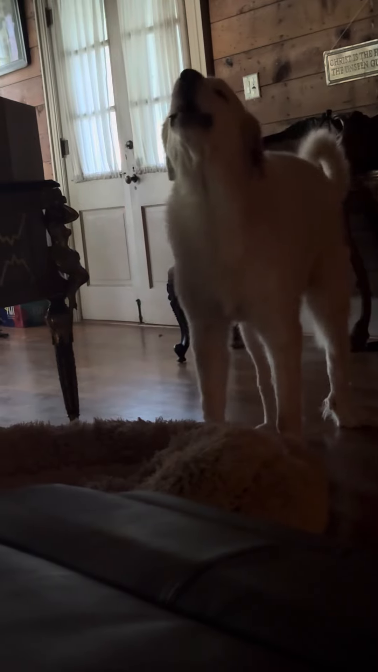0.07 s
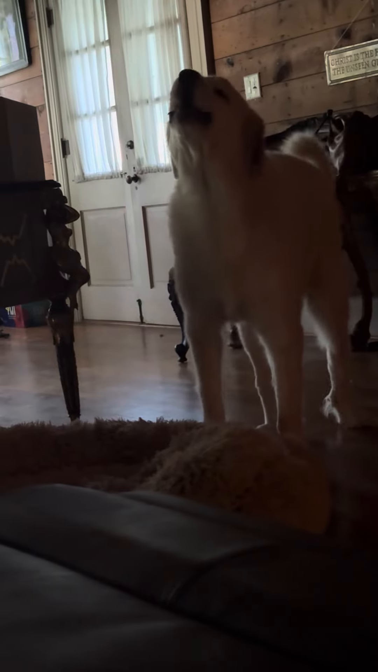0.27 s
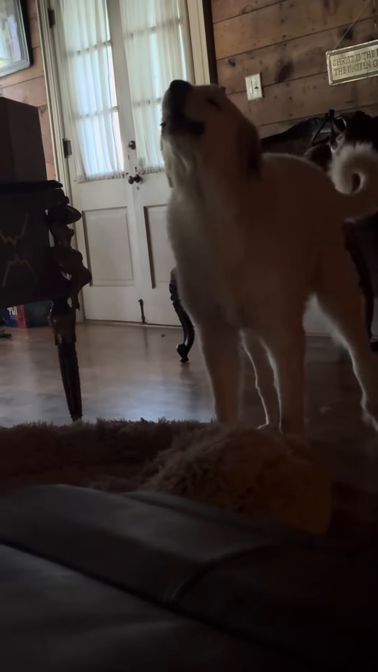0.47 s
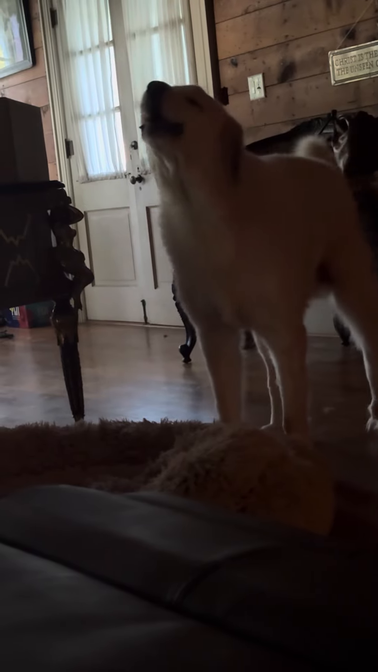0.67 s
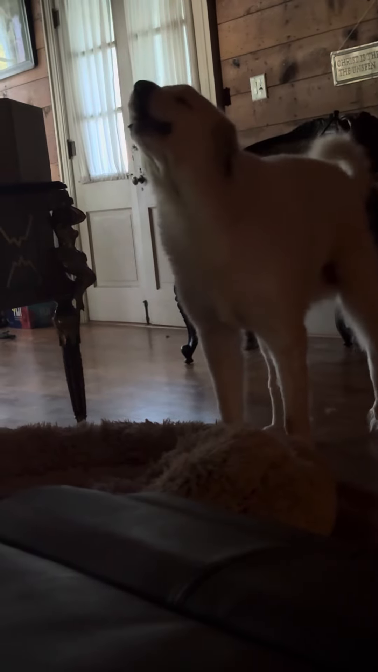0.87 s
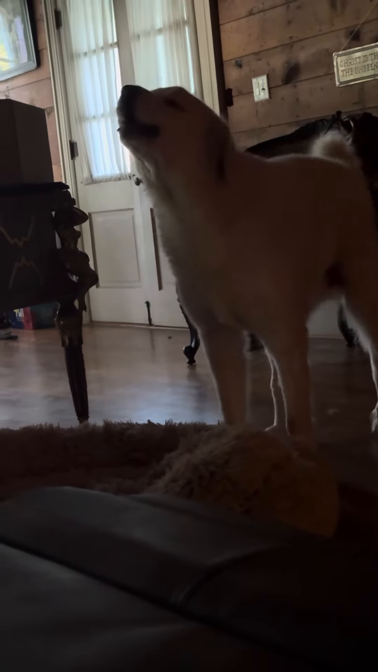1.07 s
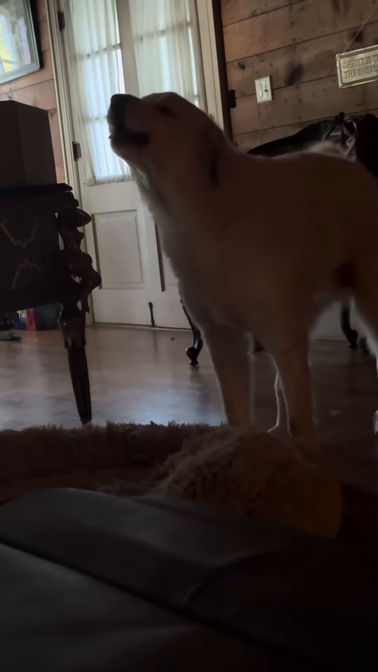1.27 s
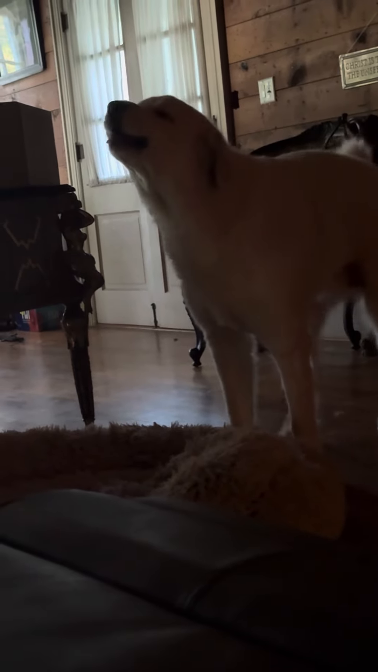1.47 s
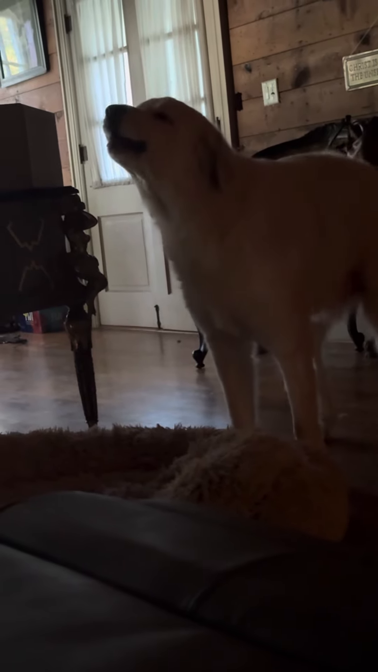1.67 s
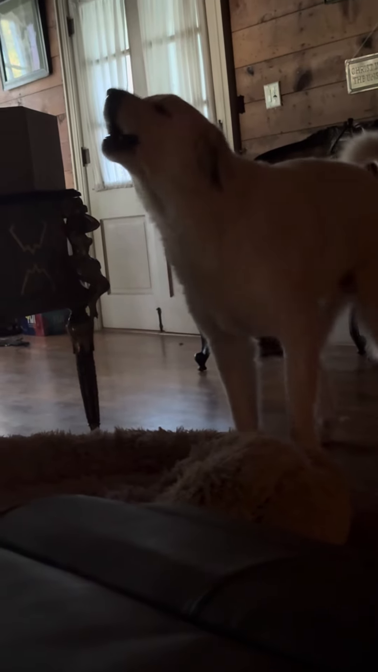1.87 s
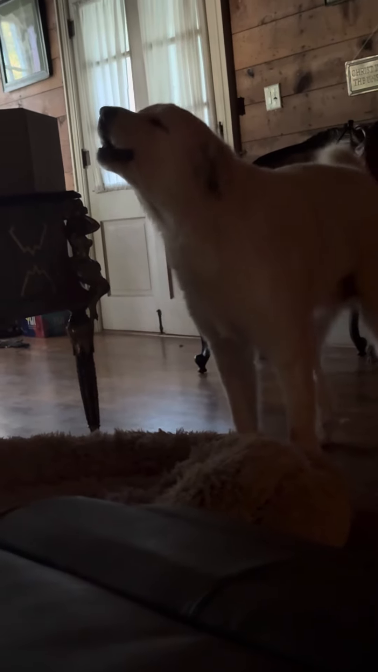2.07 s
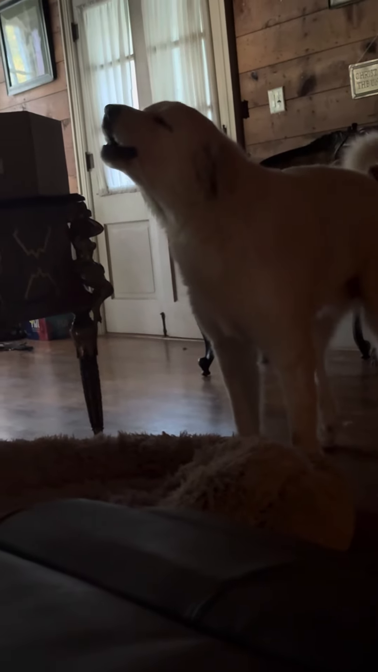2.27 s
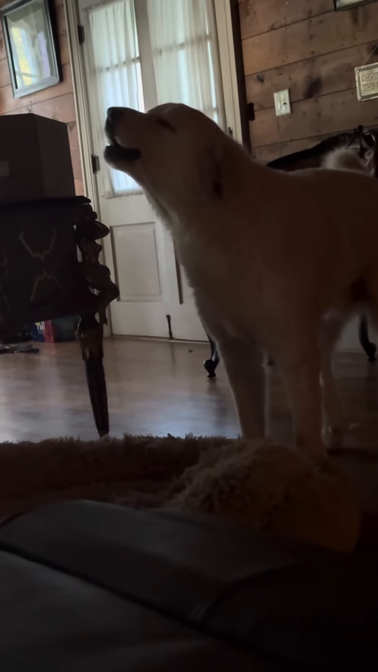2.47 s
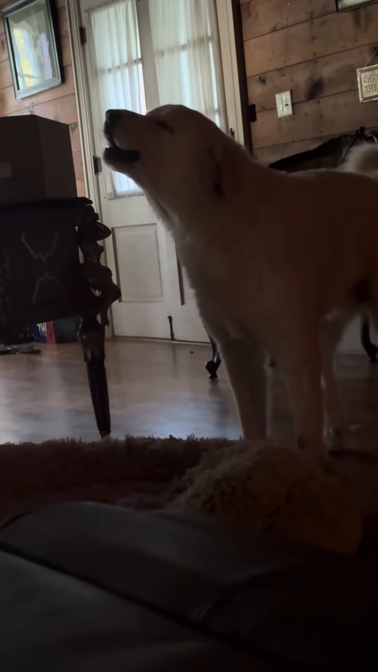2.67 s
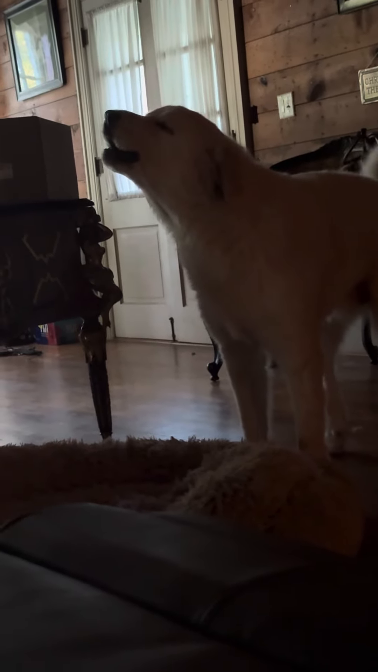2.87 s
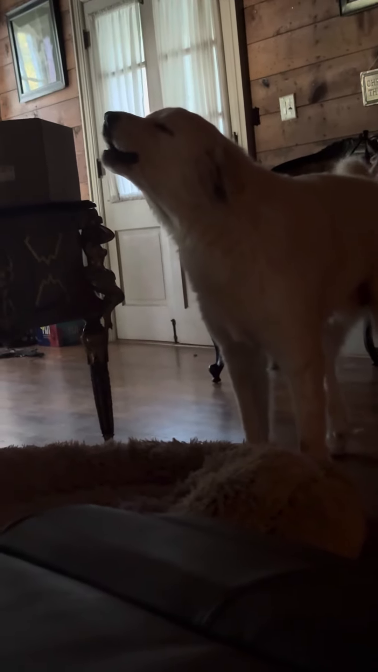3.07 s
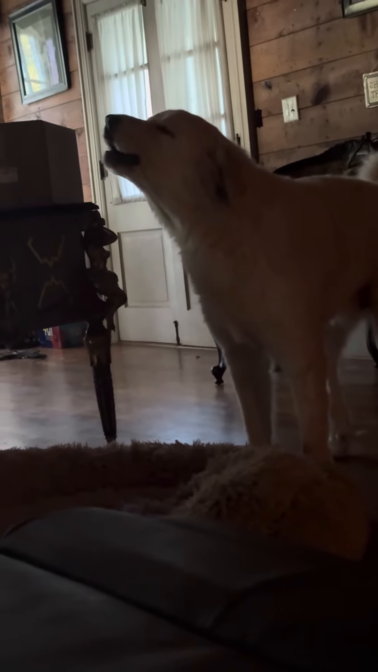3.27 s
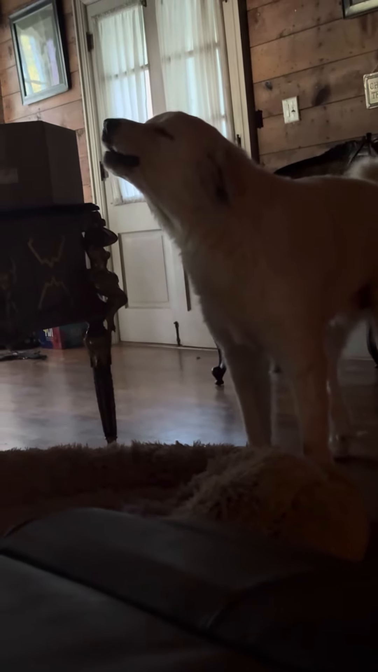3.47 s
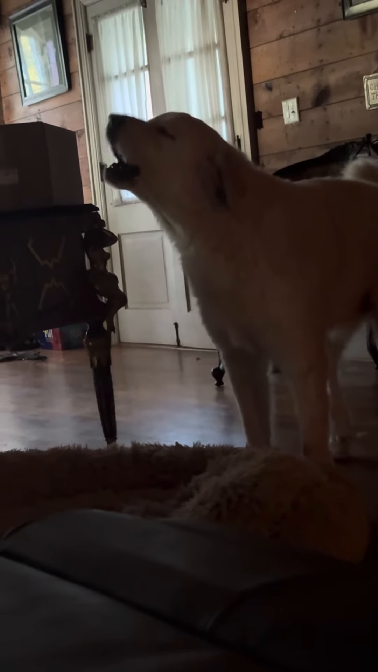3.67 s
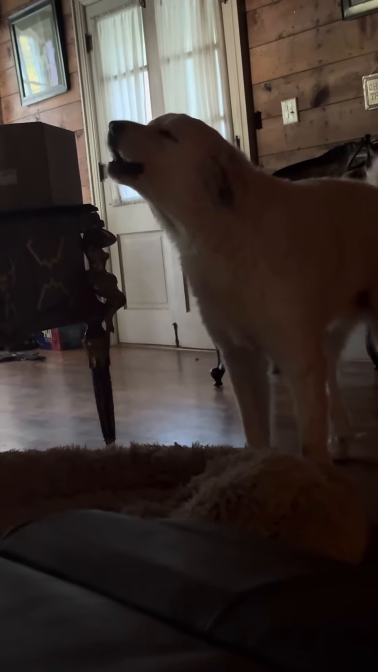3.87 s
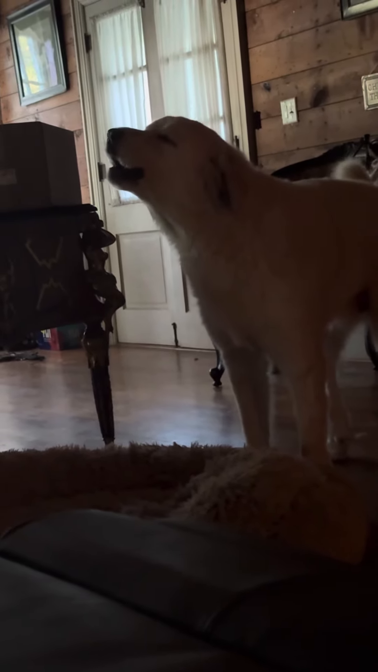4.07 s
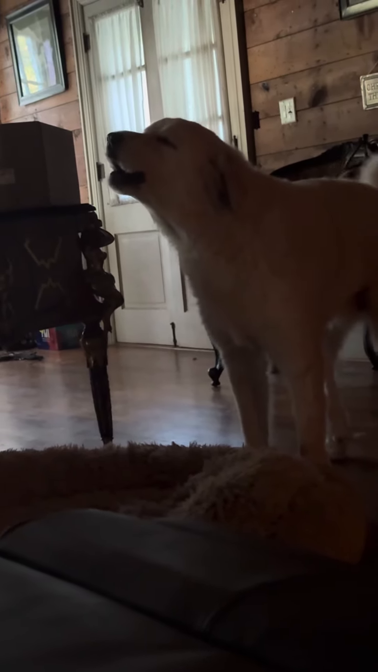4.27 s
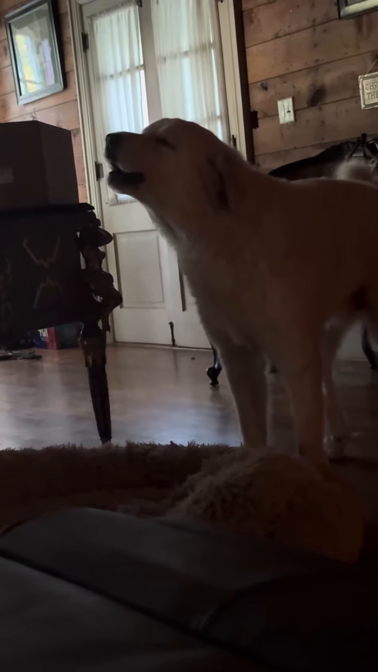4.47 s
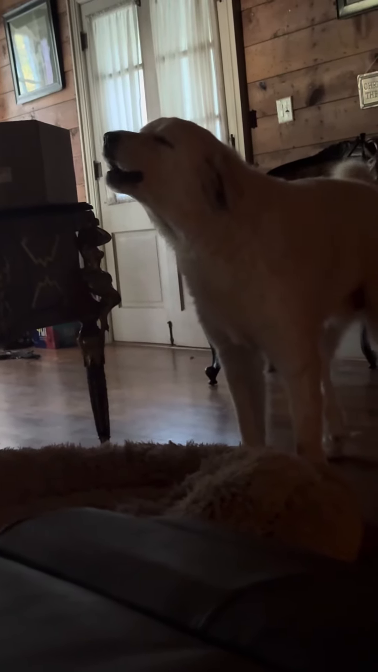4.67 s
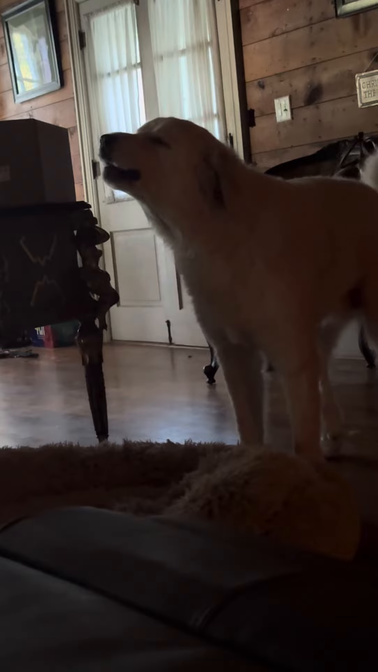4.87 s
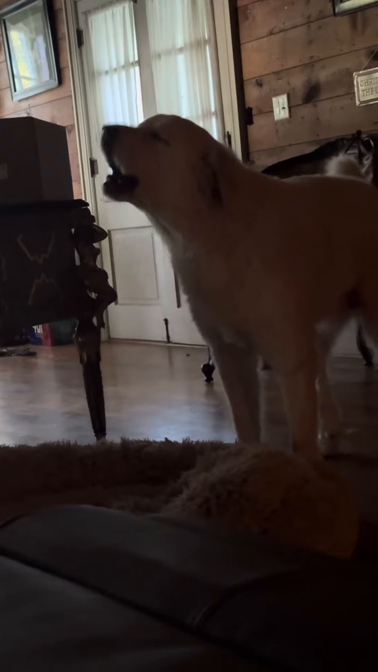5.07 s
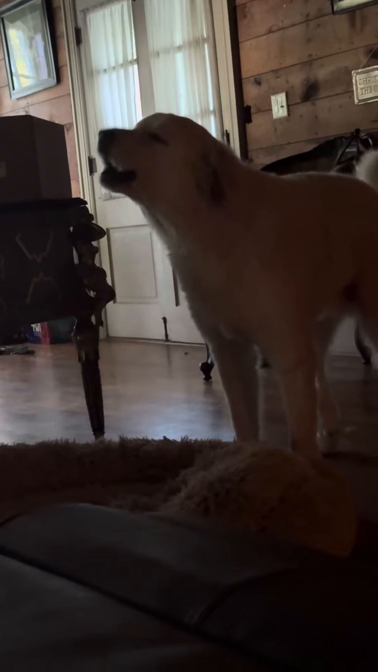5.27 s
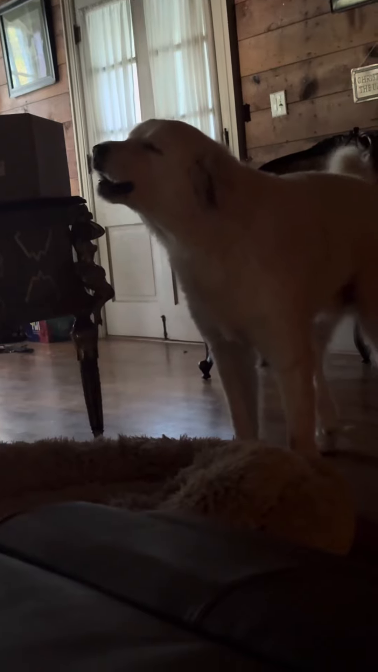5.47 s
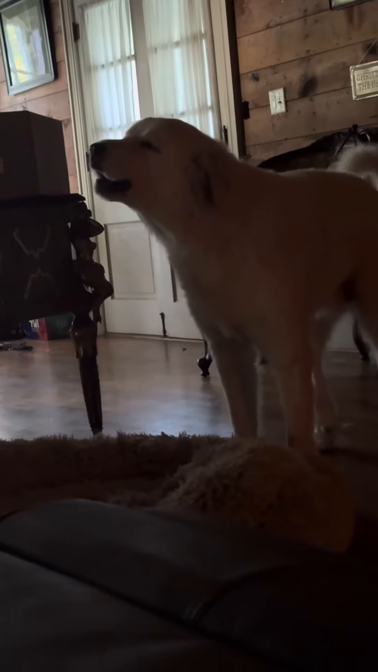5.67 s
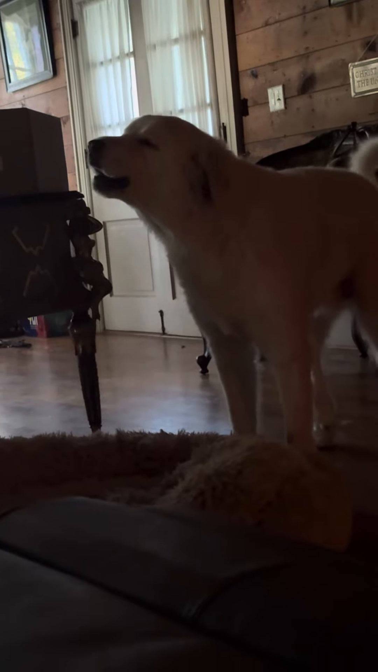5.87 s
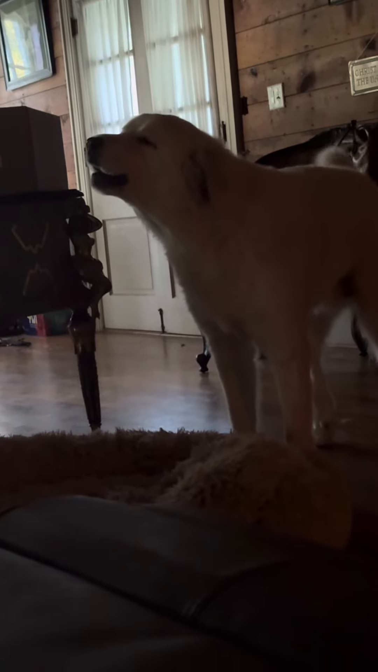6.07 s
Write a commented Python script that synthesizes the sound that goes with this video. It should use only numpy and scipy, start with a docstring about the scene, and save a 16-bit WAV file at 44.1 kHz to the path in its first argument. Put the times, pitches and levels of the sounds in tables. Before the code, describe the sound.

A large dog howls in a wood-walled living room, a couple of metres from a small stereo microphone, with short room echoes and very faint rumble and hiss. At 0 s it is already sounding on a lower chest note, which leaps at about 0.1 s to a bright, wavering high note held until 1.4 s, then sags away. In the pause, around 1.53-1.65 s, claws tick rapidly on floorboards. At 1.76 s a second howl yelps high, cracks down to a rounder low note, then flips up at 2.45 s and holds until 3.4 s. The third, from 3.65 s, starts high, drops at 3.77, rises again at 4.1 with strong wobbling, and sinks out by 4.9. A lone claw tick falls at 4.99 s. The last howl starts high at 5.07 s, breaks low at 5.2, and flips up near 5.98 s as the sound ends. Breaks are briefly rough and breathy.

```python
"""A large dog howls in a wood-walled living room, a couple of metres from a phone's two microphone ports.
Over rumble and hiss, the first howl opens on a chest note and leaps to a head note a fifth higher; claws
tick on the boards in the pause, then three more howls flip between the two, a lone tick before the last.
Each note is a sum of sine overtones with puffed noise; around each flip the folds also beat at the pitch
the two notes share, which adds faint lines between the overtones. Feedback delays make the room."""
import sys
import numpy as np
from scipy import signal
from scipy.fft import rfft, irfft, next_fast_len
from scipy.io import wavfile
from scipy.ndimage import uniform_filter1d

SR = 44100
rng = np.random.default_rng(int(sys.argv[2]) if len(sys.argv) > 2 else 0)


def voltage_ratio(decibels):
    """Convert decibels (scalar or array-like) to amplitude ratios, 20 dB per decade."""
    exponent = np.asarray(decibels, float) / 20
    return 10 ** exponent


def generate_wav(signal):
    """Clip the signal to [-1, 1] and save it as 16-bit WAV at the path in sys.argv[1]."""
    frames = np.transpose(np.atleast_2d(signal))
    scaled = np.clip(frames, -1, 1) * 32767
    pcm = np.round(scaled).astype(np.int16)
    wavfile.write(sys.argv[1], SR, pcm)


N = 269451


def at_hz(points, hz):
    """Second column of a table, read at any frequency along a logarithmic axis."""
    table = np.array(points)
    return np.interp(np.log(hz + 1e-9), np.log(table[:, 0]), table[:, 1])


def drift(rate, size):
    """Slow chance with spread 1: noise through a double one-pole low-pass at rate (Hz), run in."""
    r = np.exp(-2 * np.pi * rate * 64 / SR)   # one step every 64 samples
    noise = rng.standard_normal(size // 64 + 402)
    slow = signal.lfilter([1], [1, -2 * r, r * r], noise)[400:]
    slow = slow * (1 - r * r) ** 1.5 / np.sqrt(1 + r * r)
    return np.interp(np.arange(size) / 64, np.arange(len(slow)), slow)


def coloured(spectrum, channels):
    """Noise of rms 1 with the given spectrum."""
    size = next_fast_len(N)
    weight = voltage_ratio(at_hz(spectrum, np.fft.rfftfreq(size, 1 / SR)))
    x = irfft(rfft(rng.standard_normal((channels, size))) * weight, size)[:, :N]
    return x / np.sqrt(np.mean(x ** 2))


def appliances():
    """Steady low rumble of household appliances: shaped noise, for middle and side."""
    # rumble spectrum: (frequency [Hz], relative density [dB])
    rumble = [(20, -45.5), (32, -19.5), (45, 8), (60, 5), (110, 11), (150, 4), (200, -2), (260, -16.5),
              (340, -24), (600, -57)]
    return voltage_ratio(-60) * coloured(rumble, channels=2)


def room_air():
    """Steady hiss of the room's air: shaped noise, for middle and side."""
    # hiss spectrum: (frequency [Hz], relative density [dB])
    hiss = [(200, -10.5), (400, 7), (900, -4.5), (1800, -15), (2600, -15.5), (3250, -37), (4000, -18),
            (7000, -17.5), (9000, -35.5), (12000, -42.5), (14500, -41.5), (16000, -47.5)]
    return voltage_ratio(-67.5) * coloured(hiss, channels=2)


def room(x):
    """Twelve feedback delays each for middle and side, dying as the walls absorb."""
    # time to die by 60 dB: (frequency [Hz], time [s])
    decay_time = [(200, 0.85), (500, 0.54), (1400, 0.61), (4000, 0.63), (10000, 0.88)]
    # echo gain, against the direct sound: (frequency [Hz], gain [dB])
    echo_gain = [(200, -23), (400, -7), (700, -11), (1500, -6), (3000, -6.5), (5000, -10.5), (9000, -3.5)]
    # how wide the room sounds, side against middle: (frequency [Hz], gain [dB])
    side_gain = [(100, -31), (500, -13), (1200, -3), (2200, -28), (5000, -19)]
    size = next_fast_len(N + SR)
    hz = np.fft.rfftfreq(size, 1 / SR)
    t60 = at_hz(decay_time, hz)
    wet = np.zeros((2, len(hz)), complex)
    for k, lag in enumerate(np.geomspace(.0131, .0677, 24)):   # seconds
        echo = voltage_ratio(-60 * lag / t60) * np.exp(-2j * np.pi * hz * lag)
        sign = (-1) ** (k // 2)
        wet[k % 2] += sign * echo / (1 - echo) / np.sqrt(12)   # endless repeats, middle and side in turn
    wet *= voltage_ratio(at_hz(echo_gain, hz))
    wet[1] *= voltage_ratio(at_hz(side_gain, hz))
    return irfft(wet * rfft(x, size), size)[:, :N]


def claws():
    """Claws on floorboards: each tick rings the modes of the boards with strengths of its own."""
    # ticks, before each mode's own level: (time [s], level [dB])
    ticks = [(1.532, -63), (1.562, -51.5), (1.5805, -45), (1.6062, -44), (1.618, -48.5), (1.6547, -44.5),
             (4.9862, -48)]
    # modes of the boards: (frequency [Hz], level against the tick [dB], time to die by 60 dB [s])
    board_modes = [(69, 2, 0.1), (705, -7, 0.074), (1400, -6, .012), (4050, 2, 0.0037),
                   (5170, -7.5, 0.0073), (7560, -7.5, .006), (10430, -10, .004)]
    at = [round(s * SR) for s, _ in ticks]
    tick_db = np.array(ticks)[:, 1]
    out = np.zeros(N)
    for hz, level_db, t60 in board_modes:
        clicks = np.full(N, 1e-18)   # never quite zero
        clicks[at] = voltage_ratio(tick_db + level_db + rng.normal(0, 2.5, len(at)))
        r = voltage_ratio(-60 / (t60 * SR))
        w = 2 * np.pi * hz / SR
        out += signal.lfilter([0, np.sin(w)], [1, -2 * r * np.cos(w), r * r], clicks)
    return out


def unrest(s):
    """Level of the in-between lines and hoarseness (0-1): calm, with a peak at every flip."""
    # flips and breaks of the voice, where in-between lines and hoarseness swell and fade:
    # (time [s], peak of the lines [dB], hoarseness before the limit of 1, build-up [dB/s], fading [dB/s])
    flips = [(0.0, -23.5, 0.7, 300, 358.5), (0.126, -30.5, .9, 257, 386.5), (1.417, -56.5, 0.7, 447, 510),
             (1.86, -27, 1.1, 200.5, 455), (2.478, -39, 0.9, 599, 126.5), (3.395, -60.5, 0.8, 453.5, 131.5),
             (3.768, -31, 1, 220, 401.5), (4.152, -30.5, 0.9, 204, 140), (4.745, -42.5, .9, 398.5, 296),
             (4.82, -47.5, 1, 302.5, 197.5), (5.18, -44, 0.7, 143.5, 204), (6.009, -32, 0.9, 507.5, 244)]
    calm_db = -87          # in-between lines far from a flip
    hoarse_range_db = 29   # hoarseness drops by 1 while the lines fade this much
    at, peak_db, hoarse, up, down = np.transpose(flips)[..., None]
    loss_db = np.where(s < at, up * (at - s), down * (s - at))
    between_db = np.maximum(np.max(peak_db - loss_db, axis=0), calm_db)
    rough = np.clip(np.max(hoarse - loss_db / hoarse_range_db, axis=0), 0, 1)
    return between_db, rough


def note(rows, lift, muzzle, air, rasp, count):
    """One held note: overtones of the pitch, lines at multiples of its count-th part, air puffed each cycle."""
    # in-between lines, against the strongest of them: (frequency [Hz], level [dB])
    between = [(180, -57.5), (260, -24.5), (400, -4), (750, 0), (950, -0.5), (1300, -12), (1600, -6.5),
               (1900, -9.5), (2400, -37.5), (3300, -54)]
    # muzzle ring, one list for each howl: (time [s], level [dB])
    ring = [
        [(0.0, -48.5), (0.042, -56.5), (0.194, -47.5), (0.7, -51.5), (0.752, -56.5), (0.8, -49.5),
         (1.074, -49.5), (1.142, -56.5), (1.318, -52), (1.43, -63.5)],
        [(1.77, -59.5), (1.838, -45), (1.992, -62), (2.376, -60.5), (2.518, -50.5), (2.902, -55.5),
         (2.916, -50.5), (3.268, -57.5), (3.354, -56.5), (3.41, -63)],
        [(3.65, -72.5), (3.684, -48.5), (3.99, -65), (4.192, -48), (4.294, -56), (4.332, -45), (4.536, -54.5),
         (4.592, -44), (4.858, -69.5), (4.9, -82)],
        [(5.07, -66.5), (5.118, -42.5), (5.246, -57.5), (5.642, -61.5), (5.746, -64), (5.8, -55.5),
         (5.946, -63.5), (6.028, -46), (6.058, -57), (6.1, -51.5)],
    ]
    muzzle_from = 3300   # Hz: from here up the muzzle ring sets the levels
    s, *columns = np.transpose(rows)
    at = np.arange(round(s[0] * SR), min(round(s[-1] * SR), N))
    size = len(at)

    # muscles round every turn
    pitch, voice_db, bright_db = [
        uniform_filter1d(np.interp(at / SR, s, c), size=500, mode="nearest") for c in columns]
    pitch = uniform_filter1d(pitch, size=800, mode="nearest")
    glide = np.minimum(np.abs(np.gradient(np.log(pitch))) * SR, 2.5)   # relative speed, 1/s
    between_db, rough = unrest(at / SR)
    muzzle_db = np.interp(at / SR, *np.vstack(ring).T)
    waver = .005 / count + .003 * rough   # slack chest folds waver more
    pitch = pitch * (1 + waver * drift(50, size))
    turns = 2 * np.pi * np.cumsum(pitch) / SR / count   # phase of the shared pitch

    out = np.zeros(size)
    for k in range(1, int(12000 * count / pitch.max())):
        hz = k * pitch / count
        overtone = k % count == 0
        low = hz.mean() < muzzle_from
        if not overtone and hz[0] > 8000:
            continue
        if overtone and low:
            level_db = voice_db + at_hz(lift, hz)
            shimmer_db = 2.5 * drift(14, size)
            if k > count:   # above the fundamental
                level_db = level_db + bright_db - 0.98 * glide + shimmer_db
        elif overtone:   # roughness drains the upper overtones
            level_db = muzzle_db - 4 * rough + at_hz(muzzle, hz) + 3.1 * drift(12, size)
        else:
            if low:
                level_db = between_db + at_hz(between, hz)
            else:   # rough cycles fill the muzzle ring with lines
                level_db = muzzle_db + at_hz(muzzle, hz) - 30 * (1 - rough)
            if k % count < count - 1:   # the line just under an overtone is the strong one
                level_db = level_db - 7
            level_db = level_db + 3 * drift(32, size)
        out += np.sqrt(2) * voltage_ratio(level_db) * np.sin(k * turns + k * k)
    out *= 1 + 0.091 * rough * drift(33, size)   # unsteady cycles differ in strength

    breath_db = -65.5 + 31.2 * rough
    rasp_db = muzzle_db - 14 + 8 * rough
    noise = voltage_ratio(breath_db) * air[at] + voltage_ratio(rasp_db) * rasp[at]
    out += noise * (1 + 0.033 * np.sin(count * turns))
    rise = (at - at[0]) / (.003 * SR)
    if at[0] == 0:   # already sounding at the start
        rise = rise + 1 / .003
    fall = (at[-1] - at) / (.009 * SR)
    return at, out * np.clip(np.minimum(rise, fall), 0, 1)


def dog():
    """Head and chest notes; the shared pitch is a third of a head note and half of a chest note."""
    # notes, one list each, before waver and lift:
    # (time [s], pitch [Hz], level [dB], brightness added to the overtones below the muzzle ring [dB])
    head_notes = [
        [(.097, 557.3, -23, -1.5), (.109, 567.7, -13, -8), (.153, 562, -11.5, 7.5), (.205, 529.3, -16.5, 0.5),
         (.237, 523.3, -14.5, 5.5), (.257, 517, -10, 0), (.285, 518, -20, 3.5), (.321, 532, -19.5, 6.5),
         (.361, 553, -12, -3), (.397, 550.8, -14, 0.5), (.417, 535.3, -14.5, -2), (.481, 528.2, -16.5, 1.5),
         (.501, 526.6, -19, 2), (.529, 555, -13.5, -6), (.565, 555, -13.5, 8.5), (.609, 552.7, -13, -1.5),
         (.657, 526.4, -14.5, -8), (.741, 545.3, -12.5, -3), (.781, 546.2, -14, -2.5), (.849, 526, -16, 3),
         (.929, 532.9, -15.5, -1), (.969, 527.2, -25.5, 11), (1.037, 528.1, -9.5, -5), (1.077, 514.3, -18, 1),
         (1.097, 516.8, -20, -2), (1.285, 513.8, -20.5, 0), (1.365, 505, -14.5, -4.5),
         (1.393, 494.6, -14, -16.5), (1.417, 453, -22.5, -11.5)],
        [(1.76, 554, -34.5, 4.5), (1.772, 507.4, -22.5, 6), (1.784, 601, -25.5, 8), (1.796, 604, -13.5, 5.5),
         (1.836, 607.3, -16.5, 4), (1.85, 599.5, -11.5, 0.5), (1.864, 609, -20.5, -2)],
        [(2.447, 560, -38, 8.5), (2.459, 547, -21, -1), (2.507, 551.4, -14, -2), (2.543, 544.8, -12, -1),
         (2.579, 550, -20.5, -0.5), (2.679, 548.1, -15.5, 1.5), (2.767, 542.6, -17, 2),
         (2.863, 549.3, -16.5, 3), (2.995, 542.5, -18.5, 1.5), (3.039, 551, -20, -2.5),
         (3.079, 547.5, -13.5, 4), (3.139, 542.4, -18.5, 1), (3.171, 525.7, -17, 3), (3.195, 531, -20, 9),
         (3.225, 532.4, -18, 9.5), (3.251, 535.8, -22.5, -9), (3.295, 545.7, -17.5, 2.5),
         (3.351, 524, -18.5, 8), (3.383, 484, -17, -14), (3.395, 455, -16.5, -9)],
        [(3.645, 616.4, -34, -5), (3.657, 580.3, -22.5, 2), (3.673, 655, -20.5, 10.5), (3.689, 632.7, -15, 2.5),
         (3.737, 617.4, -16, 5.5), (3.769, 570, -12, -6.5)],
        [(4.103, 566.6, -20.5, -0.5), (4.115, 562.3, -20, -2), (4.167, 582.5, -13.5, 4.5),
         (4.215, 564, -19, -3), (4.245, 542.8, -13.5, -3.5), (4.285, 552.8, -18.5, -2.5),
         (4.312, 575, -14.5, 5), (4.331, 578.6, -18.5, 0.5), (4.345, 585, -12.5, 1.5), (4.359, 588, -12.5, -9),
         (4.399, 578, -21, 4.5), (4.425, 559, -16.5, 2.5), (4.451, 535, -17, 11), (4.468, 514.5, -20, 0),
         (4.485, 520.6, -23, -7), (4.503, 524.8, -16.5, 1.5), (4.559, 574.7, -17.5, 4),
         (4.603, 579.6, -11, -2.5), (4.639, 571.3, -15.5, -2), (4.675, 540.3, -15, 6.5), (4.687, 526, -23, 9.5),
         (4.699, 504, -15.5, -6.5), (4.739, 475.4, -22, -12)],
        [(5.065, 598, -33, -15.5), (5.077, 615.4, -27, 7), (5.105, 669.5, -15, 13.5), (5.149, 629.6, -12.5, 4),
         (5.169, 612.7, -16, 7), (5.193, 508, -18.5, 5), (5.207, 442, -17.5, -9.5)],
        [(5.977, 550, -28.5, -5.5), (5.997, 576.3, -17, 0.5), (6.049, 568.7, -18.5, 5.5),
         (6.065, 569, -18, 5.5), (6.085, 520.3, -13.5, 0), (6.105, 479, -25.5, 2.5)],
    ]
    chest_notes = [
        [(0.0, 433, -19.5, -1.5), (.012, 433.2, -7.5, -2.5), (.04, 389.3, -9, -0.5), (.064, 388.4, -30, 18.5),
         (.096, 392.4, -23, 8.5)],
        [(1.41, 350.6, -49, -11.5), (1.43, 356.4, -21, -26.5), (1.442, 268, -37.5, 8.5),
         (1.462, 288.6, -22, -1.5)],
        [(1.865, 409.7, -24.5, 11), (1.881, 430.3, -8.5, -1), (1.893, 408.2, -20.5, 6.5),
         (1.909, 394.7, -15.5, 7), (1.945, 380, -21, 5), (1.993, 375.8, -17.5, -0.5), (2.021, 377.3, -11.5, -6),
         (2.085, 360.6, -11.5, -3.5), (2.135, 350.8, -15.5, -6), (2.201, 354.8, -19.5, 4.5),
         (2.265, 364.9, -10.5, -5), (2.361, 356, -12.5, -7), (2.417, 365.9, -13, 0), (2.445, 385.5, -11, -3)],
        [(3.39, 314, -56.5, -10), (3.41, 322.5, -27, 1), (3.43, 298, -29, 8), (3.442, 289, -25.5, -12)],
        [(3.77, 395.3, -21.5, 1.5), (3.822, 391.4, -27, 9.5), (3.854, 376.5, -14, -4.5),
         (3.89, 376.6, -18.5, -1), (3.918, 374.5, -28.5, 12), (3.93, 368.7, -17.5, 3.5),
         (3.954, 367.2, -10, -9.5), (3.986, 351.4, -13.5, -4), (4.05, 354.1, -23.5, 4), (4.102, 366.4, -12, 3)],
        [(4.74, 380.6, -32, 15.5), (4.776, 365, -16.5, -8), (4.8, 367.2, -23, -3.5), (4.852, 351, -28, 3.5),
         (4.866, 336.4, -36, -0.5), (4.884, 309, -35, -1.5), (4.92, 274, -41.5, 0.5)],
        [(5.205, 387, -26, 16), (5.237, 383, -30.5, 16.5), (5.261, 383, -29, 1.5), (5.281, 388.8, -29.5, 14.5),
         (5.393, 359.2, -8.5, -7), (5.465, 343.1, -21, 2), (5.489, 345.8, -22.5, -0.5),
         (5.54, 363, -13.5, -1.5), (5.565, 367.8, -10.5, -1.5), (5.59, 372, -11.5, -3.5),
         (5.645, 359.3, -9, -6), (5.673, 353.6, -17, -4.5), (5.709, 349, -17.5, -3.5), (5.77, 361.3, -16, -0.5),
         (5.809, 379.7, -15, 1.5), (5.829, 370.2, -26.5, 15.5), (5.849, 358.4, -10.5, -17),
         (5.873, 352.5, -19, 10.5), (5.921, 340.2, -22.5, -4), (5.977, 374, -15.5, 3)],
    ]
    # throat and standing waves of the room lift some pitches and swallow others;
    # lower overtones against the note's level, for head and chest notes: (frequency [Hz], level [dB])
    head_lift = [(450, -3.5), (515, -5), (530, -5.5), (552, 0.5), (575, -3), (635, -2.5), (670, -10),
                 (950, -0.5), (1030, -27.5), (1070, -26.5), (1100, -31), (1125, -31.5), (1160, -22.5),
                 (1230, -16.5), (1320, -25.5), (1480, -18.5), (1560, -23), (1635, -40.5), (1750, -25.5),
                 (1870, -17.5), (1980, -31.5), (2080, -49.5), (2190, -38.5), (2320, -45.5), (2430, -40),
                 (2600, -66), (2700, -58), (2775, -33.5), (2900, -54), (3300, -74.5)]
    chest_lift = [(270, -7), (340, -3.5), (362, -5.5), (385, -12), (430, -5), (600, -19.5), (705, -18.5),
                  (735, -13.5), (770, -21), (860, -24), (1035, -27.5), (1090, -26.5), (1150, -27),
                  (1370, -37), (1450, -31.5), (1530, -28), (1700, -26.5), (1750, -58), (1900, -31.5),
                  (2150, -59), (2270, -40.5), (2400, -61.5), (2550, -56), (2680, -60), (2780, -47.5),
                  (2900, -62), (3300, -72)]
    # higher overtones against the muzzle ring, for head notes and for chest notes sung with the
    # jaw lower: (frequency [Hz], level [dB])
    head_muzzle = [(3300, -33), (3600, -14.5), (3800, -10), (4050, -2.5), (4250, 1.5), (4400, -3.5),
                   (4520, -12.5), (4660, -6.5), (4760, -23), (4850, -24), (5000, -25.5), (5170, -8.5),
                   (5300, -20), (5480, -6), (5620, -26), (5800, -20), (6000, -31), (6200, -34.5),
                   (6500, -17.5), (6700, -16), (7000, -24.5), (7500, -27.5), (7750, -40.5), (8000, -31),
                   (9000, -43.5), (12000, -39.5)]
    chest_muzzle = [(3300, -34), (3800, -15), (4050, -6), (4200, -16), (4400, -9), (4550, -19), (4750, -4),
                    (4950, -19.5), (5200, -1.5), (5290, -16), (5400, -2.5), (5620, -28), (5900, -12.5),
                    (6150, -24), (6350, -16.5), (6800, -25.5), (7200, -23.5), (7600, -29), (9000, -30),
                    (12000, -43.5)]
    # air rushing through throat and muzzle: (frequency [Hz], relative density [dB])
    breath_spectrum = [(150, -19), (300, -15.5), (600, 18), (1000, 4), (1500, -17), (2000, -8.5),
                       (2270, -11.5), (2500, -22.5), (2780, -15), (3000, -30), (3300, -39.5), (5000, -34.5),
                       (9000, -47)]
    # turbulence at teeth and nose: (frequency [Hz], relative density [dB])
    rasp_spectrum = [(1800, -35), (2600, -11.5), (3250, -34.5), (3800, -3), (4400, -6), (4900, -14),
                     (5400, -10.5), (6050, -15.5), (6500, -10.5), (7000, -11.5), (8500, -18), (10500, -15),
                     (12000, -26), (14000, -20), (15500, -21), (16500, -45.5)]
    out = np.zeros(N)
    air = coloured(breath_spectrum, channels=1)[0]
    rasp = coloured(rasp_spectrum, channels=1)[0]
    registers = ((head_notes, head_lift, head_muzzle, 3), (chest_notes, chest_lift, chest_muzzle, 2))
    for notes, lift, muzzle, parts in registers:
        for rows in notes:
            at, sound = note(rows, lift, muzzle, air, rasp, count=parts)
            out[at] += sound
    return out


def scene():
    """Dog and claws with their room, over the steady noise of the house, as left and right."""
    direct = dog() + claws()
    mid_echo, side_echo = room(direct)
    mid_air, side_air = appliances() + room_air()
    mid = direct + mid_echo + mid_air
    side = side_echo + voltage_ratio(-30.5) * side_air
    return np.array([mid + side, mid - side])


def band_limit(x):
    """A steep low-pass at the top of the band."""
    return signal.sosfilt(signal.butter(12, 15700, fs=SR, output="sos"), x)


def record(dry):
    """Two microphone ports a short way apart: the high treble reaches them most out of phase."""
    # left port ahead of the right: (frequency [Hz], phase [rad])
    port_lead = [(100, -.12), (340, -.3), (950, -.1), (2000, .08), (4740, .25), (5500, -.3), (6460, -1.0),
                 (8270, -2.0), (10000, -2.6), (12000, -2.8), (15000, -2.2)]
    # left port over right: (frequency [Hz], level [dB])
    port_balance = [(100, .4), (300, .5), (600, .7), (1200, .6), (2500, 0), (9000, 0)]
    size = next_fast_len(N + 4096)
    hz = np.fft.rfftfreq(size, 1 / SR)
    # each port takes half of the difference
    half = voltage_ratio(at_hz(port_balance, hz) / 2) * np.exp(.5j * at_hz(port_lead, hz))
    ports = irfft(rfft(dry, size) * [half, 1 / half], size)[:, :N]
    return band_limit(ports)


dry = scene()
out = record(dry)
generate_wav(out)
```